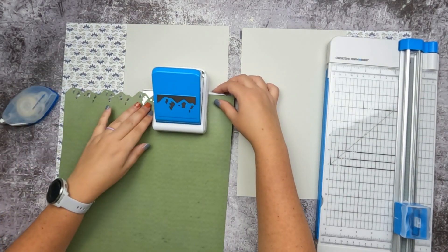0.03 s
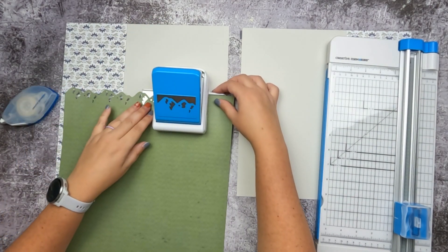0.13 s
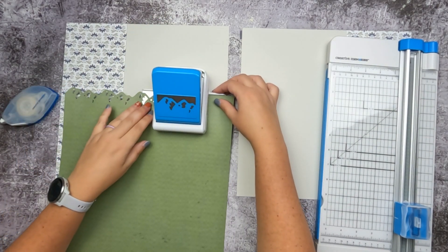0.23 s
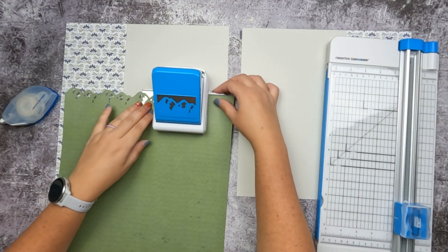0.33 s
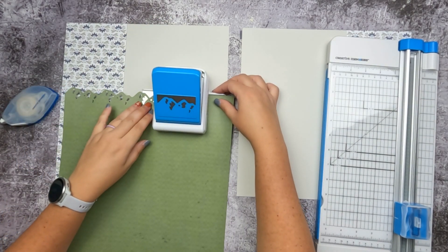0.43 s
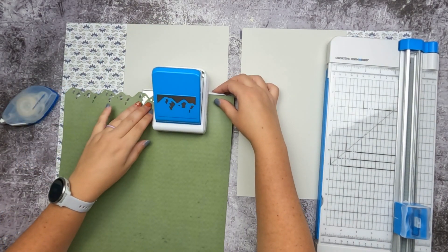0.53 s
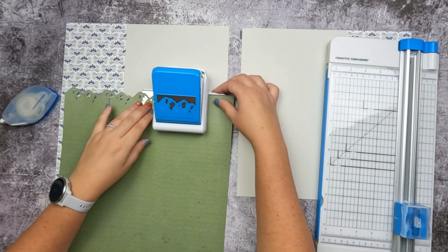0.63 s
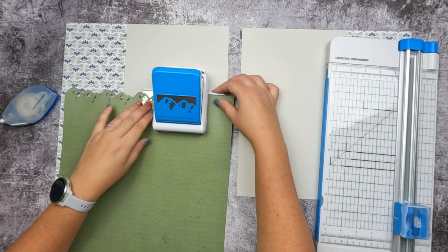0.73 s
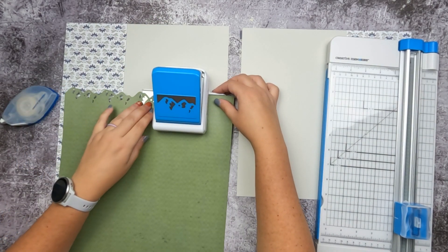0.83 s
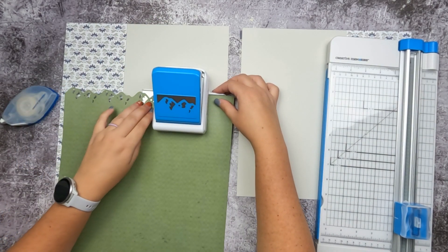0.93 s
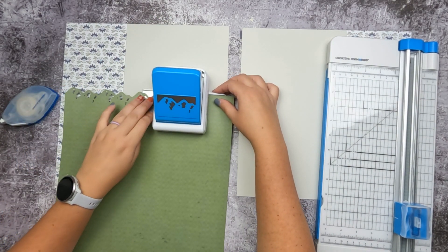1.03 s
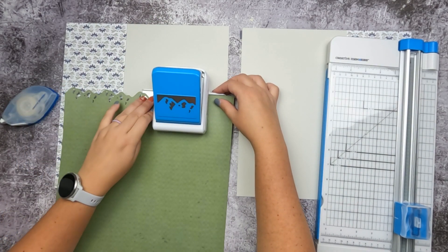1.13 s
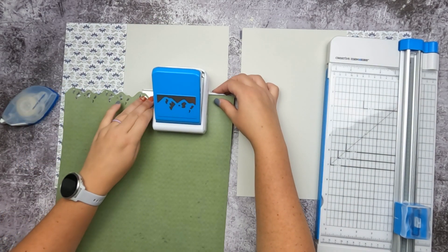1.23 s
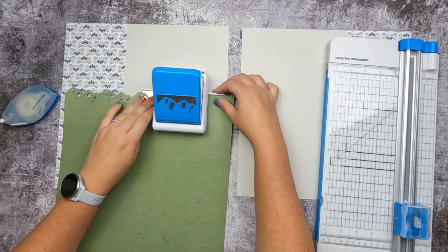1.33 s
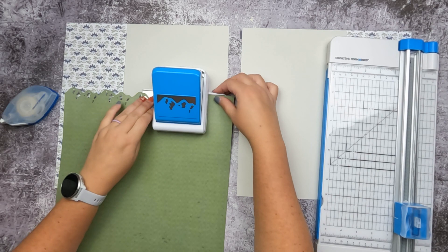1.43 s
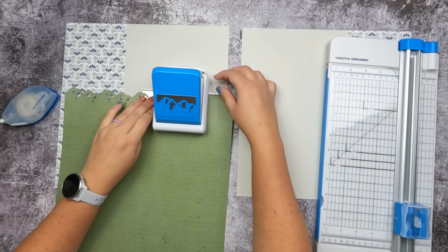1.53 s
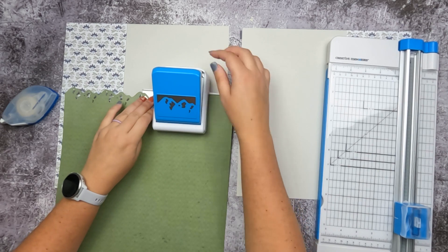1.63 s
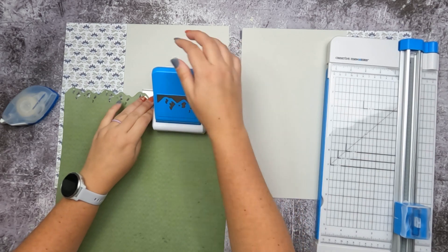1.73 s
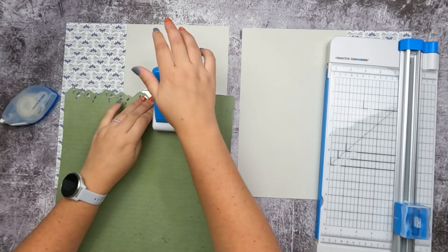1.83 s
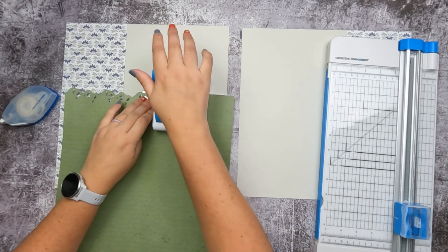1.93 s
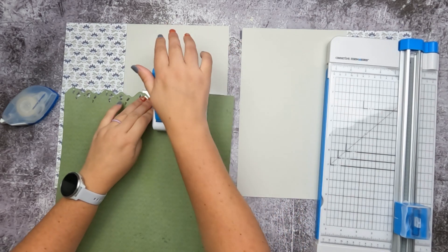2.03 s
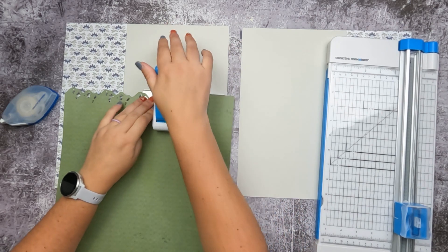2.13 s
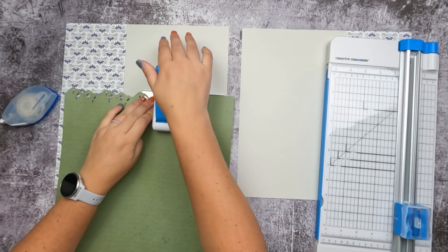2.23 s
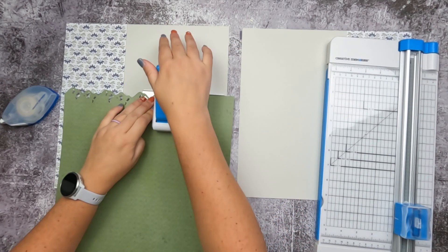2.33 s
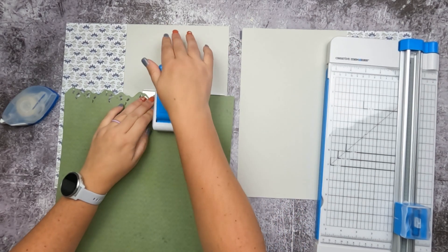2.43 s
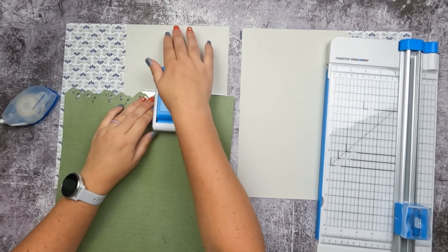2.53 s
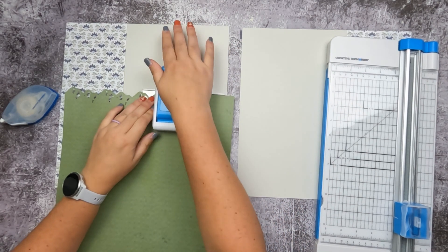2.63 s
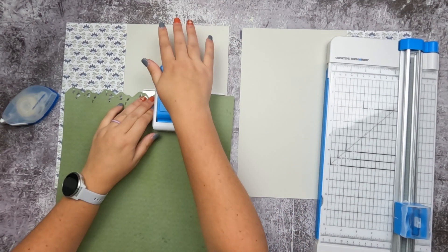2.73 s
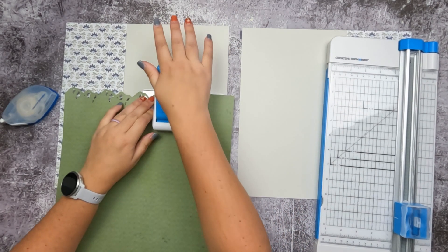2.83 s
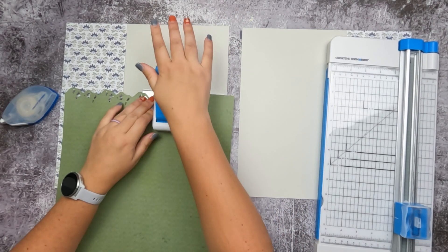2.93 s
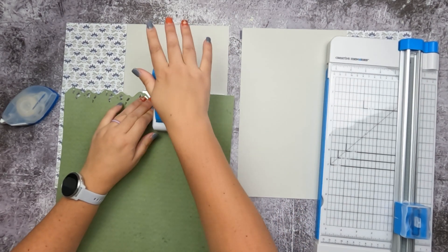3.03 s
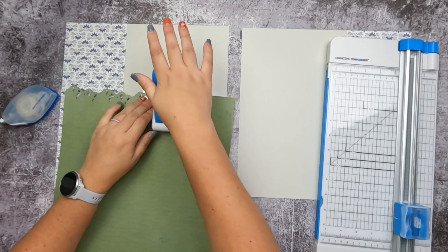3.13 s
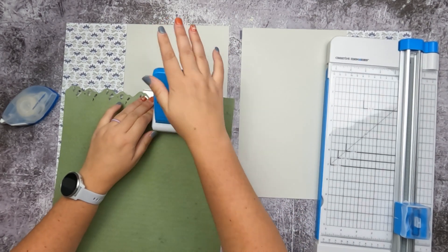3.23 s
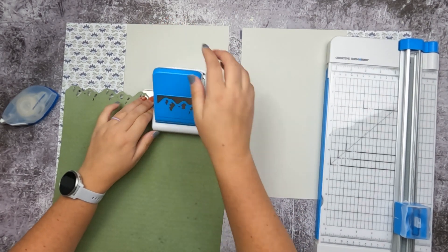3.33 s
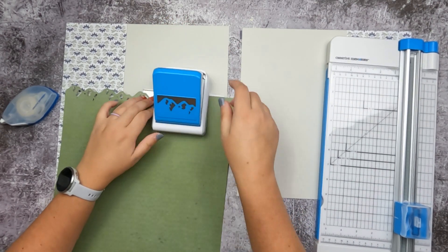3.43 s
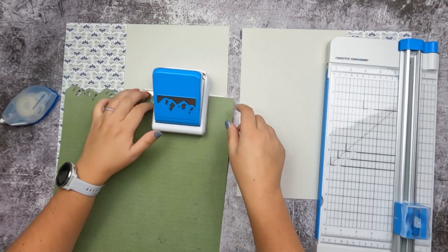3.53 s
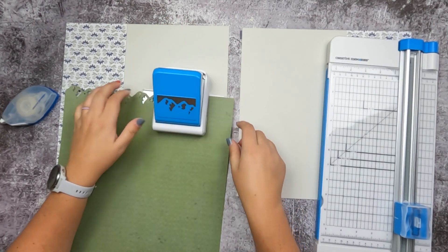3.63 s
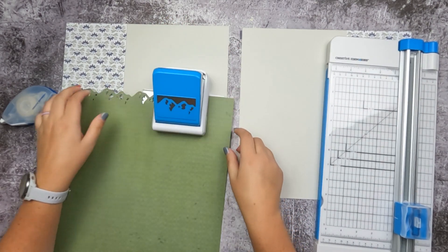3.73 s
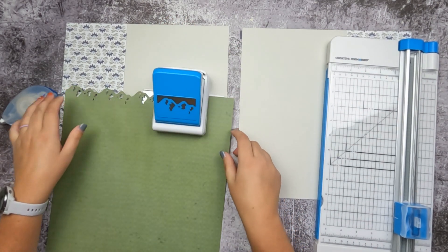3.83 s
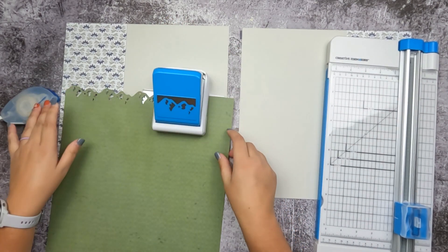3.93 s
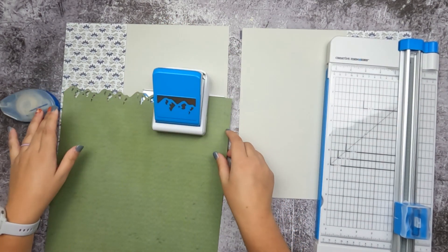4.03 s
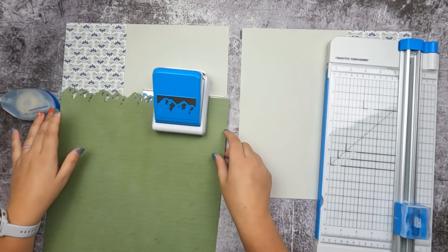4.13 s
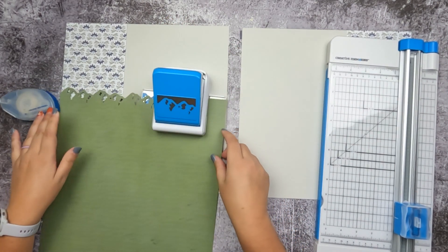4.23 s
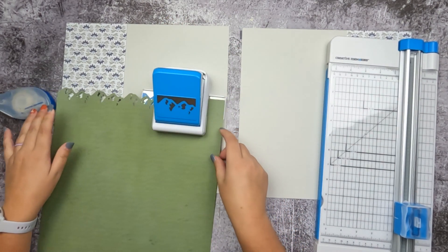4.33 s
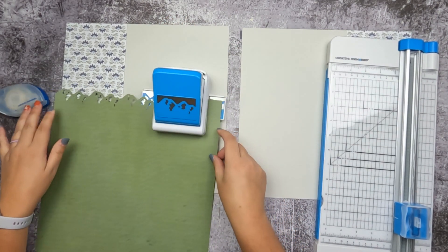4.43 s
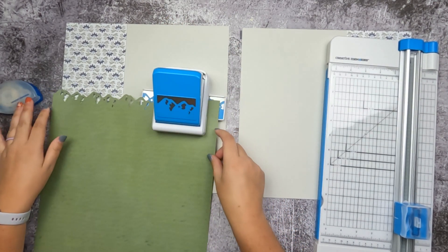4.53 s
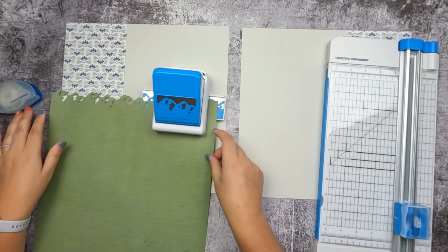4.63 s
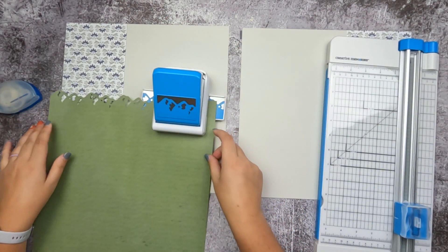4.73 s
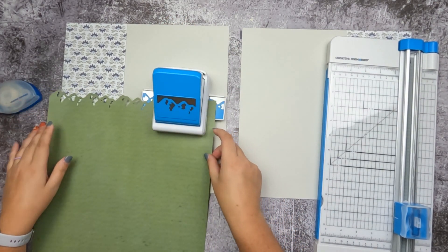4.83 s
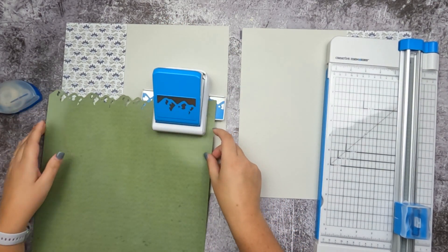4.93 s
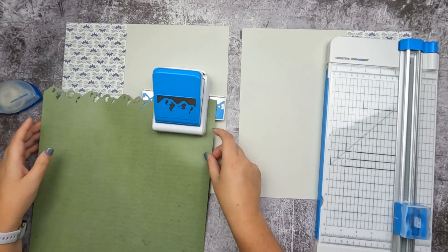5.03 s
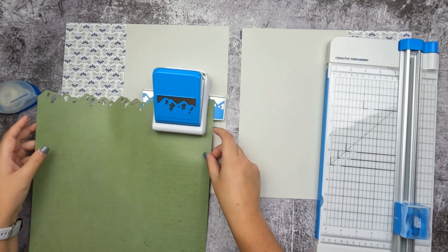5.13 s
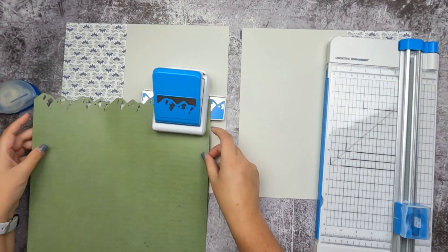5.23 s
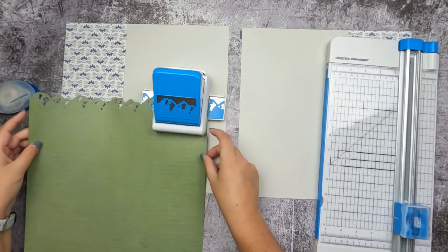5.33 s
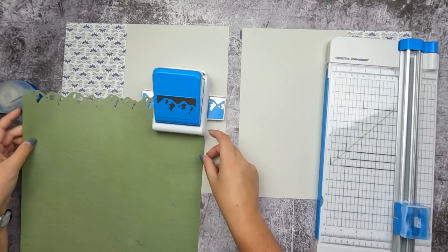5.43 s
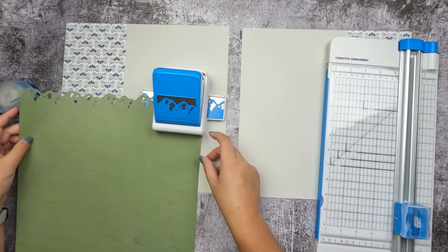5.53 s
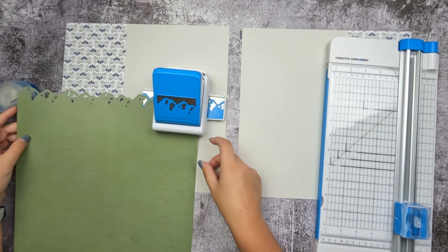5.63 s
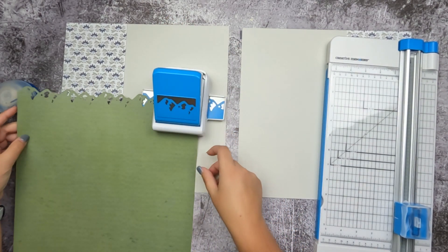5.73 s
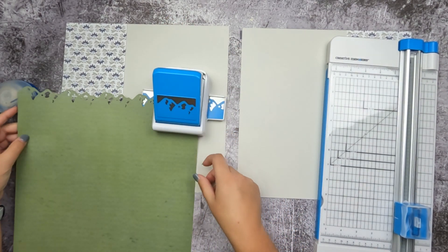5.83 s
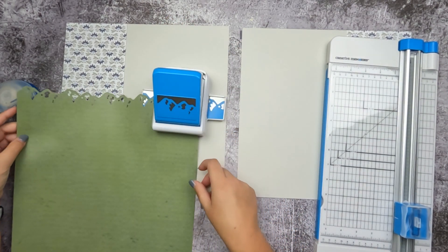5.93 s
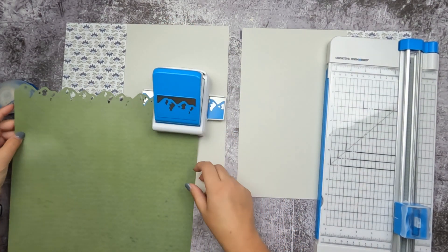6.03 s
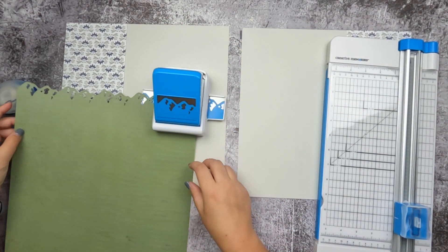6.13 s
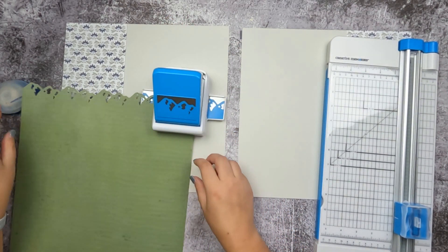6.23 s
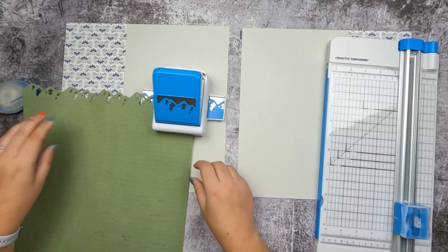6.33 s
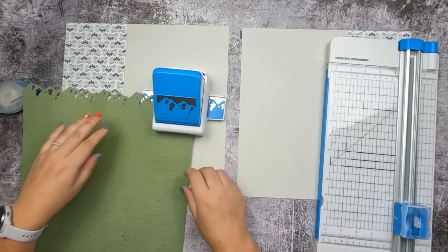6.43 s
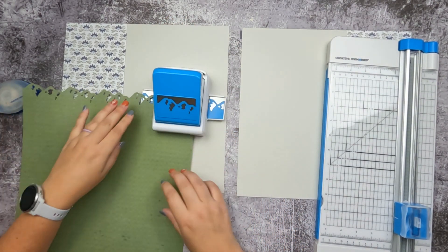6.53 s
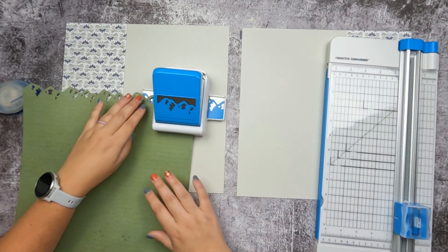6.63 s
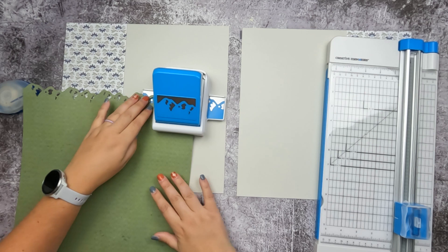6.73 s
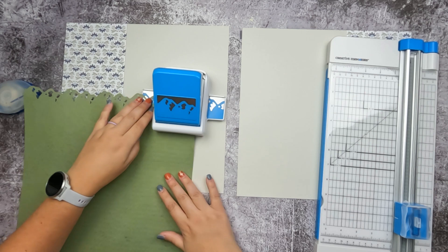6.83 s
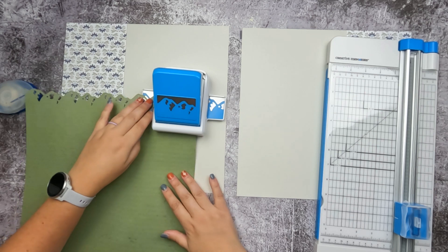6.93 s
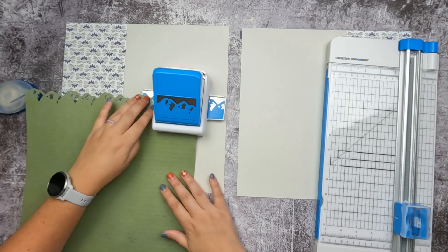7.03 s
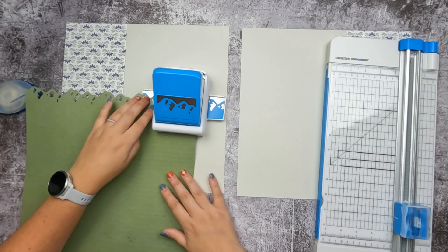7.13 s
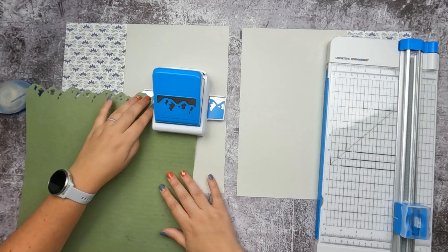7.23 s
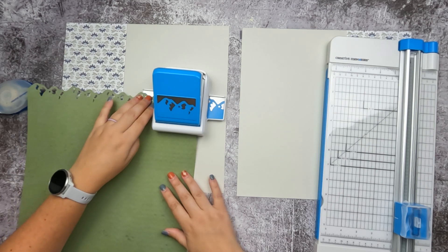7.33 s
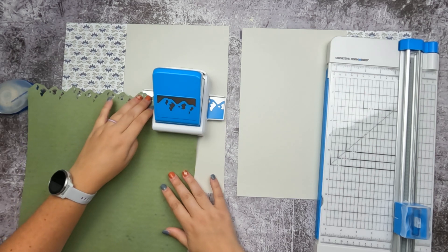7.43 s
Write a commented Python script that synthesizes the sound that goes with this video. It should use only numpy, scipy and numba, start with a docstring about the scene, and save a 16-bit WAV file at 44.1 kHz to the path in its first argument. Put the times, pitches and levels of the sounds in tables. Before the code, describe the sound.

A close stereo microphone on a wooden-sounding table in a small, dull room. Quiet hush and tiny paper ticks come first, then a sharp crackling double crunch and a heavy clunk as a craft punch bites thick paper. Low thuds and rattling follow as the table rocks, with a small lever creak. Afterwards the sheet is rubbed, shifted and ticked by fingers, fading to soft rustles; a far engine hums faintly.

```python
"""A hand leans on a plastic border punch close by until its steel die crunches through card in three bites.
The lever creaks back, the table rocks and knocks for a second, and the card is slid and ticked about.
Short pushes and grit ring the modes of punch and table; the card is filtered noise, clicks and bursts.
Behind them lie low shaking of the table, two climbing tones of an engine far outside and quiet room hush.
A two-port microphone hears all this with a short scatter and a dull room tail."""
import sys
import numpy as np
from scipy import signal
from scipy.fft import rfft, irfft
from scipy.io import wavfile
from scipy.ndimage import uniform_filter1d
from numba import njit

SR = 44100
rng = np.random.default_rng(int(sys.argv[2]) if len(sys.argv) > 2 else 0)


def wrap_up_sound(samples):
    """Save the sound to the file named by the first command line argument, as 16-bit audio."""
    columns = np.atleast_2d(samples).T
    # keep every value between -1 and 1, then stretch to whole-number steps
    tamed = np.clip(columns, -1, 1)
    steps = np.round(tamed * 32767).astype(np.int16)
    wavfile.write(sys.argv[1], SR, steps)


N = 329868  # samples, about 7.5 s


def undb(db):
    """Decibels to an amplitude factor."""
    return 10 ** (np.asarray(db) / 20)


def unit(x):
    """Scale to rms 1."""
    return x / np.sqrt(np.mean(x ** 2))


def noise():
    """White noise for the whole scene."""
    return rng.standard_normal(N)


def wobble(cutoff_hz):
    """Slow chance of rms 1: noise low-passed at cutoff_hz."""
    return unit(signal.lfilter(*signal.butter(2, cutoff_hz, fs=SR), noise()))


def tone(hz):
    """Sine of rms 1 whose pitch follows hz."""
    phase = 2 * np.pi * np.cumsum(hz) / SR
    return np.sqrt(2) * np.sin(phase)


def band(x, hz, width_hz):
    """Two-pole resonance, gain 1 at the centre."""
    centre_hz = min(hz, .45 * SR)
    sharpness = hz / min(width_hz, .3 * SR)
    return signal.lfilter(*signal.iirpeak(centre_hz, sharpness, fs=SR), x)


@njit
def sweep(x, hz, width_hz):
    """State-variable band-pass whose centre moves."""
    y = np.empty(len(x))
    band_state, low_state = 0., 0.
    for i in range(len(x)):
        g = np.tan(np.pi * hz[i] / SR)
        damping = width_hz / hz[i]
        v = (band_state + g * (x[i] - low_state)) / (1 + g * (g + damping))
        band_state = 2 * v - band_state
        low_state += 2 * g * v
        y[i] = damping * v
    return y


def ring(force, modes):
    """Decaying modes driven by a force; neighbours swing in opposite sense."""
    out = 0
    for k, (hz, db, t60_s) in enumerate(modes):
        pole = np.exp(2j * np.pi * hz / SR - np.log(1000) / (t60_s * SR))
        swing = signal.lfilter([1], [1, -pole], force + 1e-18).imag
        out = out + (-1) ** k * undb(db) * swing
    return out


def blows(times, db, length_s, rough):
    """A short push at each time; rough (0-1) breaks it up into a burst of small slips."""
    force = np.zeros(N + SR)
    n = int(length_s * SR) + 2
    shape = np.hanning(n + 2)[1:-1]
    smooth_push = shape / shape.sum()
    slip_shape = shape / np.sqrt(np.sum(shape ** 2))
    chance = rng.standard_normal((len(times), SR // 20))
    for s, gain, slips in zip(times, undb(db), chance):
        push = (1 - rough) * smooth_push + rough * slip_shape * slips[:n]
        force[int(s * SR):int(s * SR) + n] += gain * push
    return force[:N]


def grit(spread_db, per_s):
    """Dense clicks of uneven size, rms 1."""
    sizes = undb(spread_db * rng.exponential(size=N))
    struck = rng.random(N) < per_s / SR
    return unit(sizes * struck * noise())


def bursts(times, db, hz, t60_s, wide):
    """A sharp click and a dying noise burst round its pitch at each time; wide = width / pitch, db = peak."""
    out, t = np.zeros(N + SR), np.arange(SR // 10) / SR
    for s, gain, f, decay_s in np.broadcast(times, undb(db), hz, t60_s):
        burst = rng.standard_normal(len(t)) * 1000 ** (-t / max(decay_s, .002))
        burst[0] += 9.  # the click
        burst = band(band(burst, f, wide * f), f, 2 * wide * f)
        out[int(s * SR):int(s * SR) + len(t)] += gain * burst / np.abs(burst).max()
    return out[:N]


FADE_DB = 25  # how far a stroke lies under its peak at its start and end


def strokes(rows, roundness):
    """Rows swell from start to peak and die toward the end; returns level and power-weighted other columns."""
    t, fine_t = np.arange(0, N / SR + .002, .001), np.arange(N) / SR
    start, peak, end, db, *columns = np.transpose(rows)[:, :, None]
    # rise and fall take at least 2 ms, even where an end is given before its peak
    before = (peak - t) / np.maximum(peak - start, .002)
    after = (t - peak) / np.maximum(end - peak, .002)
    away = np.where(t < peak, before, after)
    power = undb(db - FADE_DB * np.minimum(away, 4) ** roundness) ** 2
    total = power.sum(0)
    blended = [(power * c).sum(0) / total for c in columns]
    return [np.interp(fine_t, t, c) for c in (np.sqrt(total), *blended)]


def curves(tables):
    """A fade that is 1 inside the spans and 0 outside, then the columns over time."""
    rows, t = np.concatenate(tables), np.arange(N) / SR
    inside = sum((t >= k[0][0]) & (t < k[-1][0]) for k in tables) > 0
    fade = uniform_filter1d(1. * inside, size=600)
    return [fade, *(np.interp(t, rows[:, 0], c) for c in rows[:, 1:].T)]


# Colour of the quiet room's hush. Each row: frequency in Hz, relative level in dB per Hz.
AIR_COLOUR = [(35, -45.5), (60, -15.5), (102, -27.5), (162, -4.5), (251, -7.5), (295, -19), (408, -11),
              (480, -16), (1420, -23), (1710, -22), (1880, -25.5), (5180, -34.5), (15000, -44)]
AIR_DB, AIR_SIDE_DB = -70, -2.5  # rms of the part common to both ports; differing part minus common
AIR_LEFT_DB = 3  # left minus right


def air():
    """Room hush: shaped noise, partly different at the two ports of the microphone."""
    hz = np.fft.rfftfreq(N, 1 / SR) + 1
    colour_hz, colour_db = np.array(AIR_COLOUR).T
    gain = undb(np.interp(np.log(hz), np.log(colour_hz), colour_db))
    mid, side = (unit(irfft(rfft(noise()) * gain, N)) for _ in range(2))
    ports = mid + undb(AIR_SIDE_DB) * side * np.array([[1], [-1]])
    return undb(AIR_DB) * ports * undb([[AIR_LEFT_DB / 2], [-AIR_LEFT_DB / 2]])


# The engine far outside, in two spans.
# Each row: time in seconds, shaft pitch in Hz, shaft tone in dB, firing tone in dB.
FAR_ENGINE = [
    [(4.1, 49.8, -73, -90), (4.39, 51.9, -73, -85.5), (4.656, 54.8, -67.5, -76), (4.842, 55.4, -74, -69.5),
     (4.97, 55.4, -79, -76)],
    [(5.36, 60, -85, -78.5), (5.44, 60.2, -83, -67), (5.686, 62.06, -71.5, -61), (5.842, 61.9, -94, -73.5),
     (6.086, 62.8, -81.5, -62), (6.3, 63.6, -91.5, -72), (6.46, 64.1, -84, -69), (6.95, 64.6, -84.5, -75.5)],
]


def engine():
    """Shaft tone and its double, the firing tone, climb as the engine pulls away."""
    on, hz, shaft_db, firing_db = curves(FAR_ENGINE)
    return on * (undb(shaft_db) * tone(hz) + undb(firing_db) * tone(2 * hz))


# The table as a whole slab. Each row: frequency in Hz, level in dB, t60 in seconds.
SLAB_MODES = [(32.7, -7.5, 0.23), (102, -1.5, 0.043), (153, 0, 0.19)]
# Its top panel. Each row: frequency in Hz, level in dB, t60 in seconds.
PANEL_MODES = [(222, -4, .12), (263, -5, 0.14), (312.5, 3.5, 0.11), (444, -8, 0.087)]
# Low shaking of the table, strongest after the snaps and knocks.
# Each row: start, peak and end in seconds, level in dB, upper modes minus level in dB.
TABLE_SHAKES = [(1.25, 1.45, 1.56, -58.5, 3), (1.7, 1.85, 2.02, -60.5, -17), (2.02, 2.06, 3.2, -47, -22),
                (2.27, 2.33, 2.5, -30, -10.5), (2.38, 2.46, 2.51, -39, -10),
                (2.55, 2.64, 2.735, -21.5, -30), (2.72, 2.83, 3.08, -43.5, -15), (3., 3.14, 3.15, -50, 9),
                (3.12, 3.27, 3.47, -40, -17.5), (3.4, 3.46, 3.8, -47, -14), (3.6, 3.67, 3.83, -50.5, -8),
                (3.8, 3.87, 4.2, -57, -12.5)]
RUMBLE_DB, RUMBLE_UPPER_DB = -74.5, -75.5  # faint steady rumble: median level of the lowest mode, upper modes


def shake():
    """Snaps and knocks leave the table's lowest mode wobbling and its others stirred, over a faint rumble."""
    level, upper_db = strokes(TABLE_SHAKES, roundness=1.1)
    push = noise()
    lowest = unit(band(band(noise(), 21, 31), 18, 50))
    upper = unit(ring(push, SLAB_MODES[1:]) + undb(-2.5) * ring(push, PANEL_MODES))
    lowest_level = level + undb(RUMBLE_DB + 1.3 * wobble(3.7))
    upper_level = level * undb(upper_db) + undb(RUMBLE_UPPER_DB)
    return lowest_level * lowest + upper_level * upper


# Strokes of the card on the mat, and one faint spring squeak near 3.3 s.
# Each row: start, peak and end in seconds, level in dB,
# treble minus level in dB, flutter centre in Hz, body minus level in dB.
CARD_STROKES_AND_SQUEAK = [(1.2, 1.216, 1.23, -68.5, -5.5, 2350, -8),
                           (1.287, 1.297, 1.61, -64.5, -32, 1700, 3.5),
                           (1.2, 1.41, 1.42, -65, -21, 1740, 2), (1.474, 1.482, 1.56, -56, -5.5, 2210, -13),
                           (1.595, 1.626, 1.66, -62.5, -7, 2660, -6.5),
                           (3.25, 3.29, 3.46, -67, -9, 2050, -8), (3.51, 3.553, 3.64, -52.5, -11, 2150, -9),
                           (3.63, 3.645, 3.715, -58, -6, 2180, -8),
                           (3.65, 3.81, 3.89, -62.5, -2, 2400, -16),
                           (3.95, 3.967, 4.08, -60.5, -8.5, 3200, -11),
                           (4.0, 4.146, 4.2, -61, -8, 3000, -8.5), (4.17, 4.248, 4.44, -55, -11, 3800, -19),
                           (4.3, 4.55, 4.74, -59.5, -5, 3000, -6.5),
                           (4.55, 4.836, 4.98, -59.5, -5.5, 2640, -9), (2.5, 5., 10, -74, -6, 2702, -4),
                           (5.03, 5.038, 5.1, -59.5, 1, 2665, 3), (5.15, 5.217, 5.39, -49, -7, 3040, -14),
                           (5.325, 5.337, 5.45, -57, -9, 2400, 2),
                           (5.3, 5.5, 5.7, -51.5, -11.5, 2800, -26.5),
                           (5.45, 5.7, 5.77, -47, -19, 2650, -16),
                           (5.74, 5.78, 6.54, -67.5, -13, 2720, -4.5),
                           (5.85, 5.98, 6.32, -55.5, -7, 2850, -13),
                           (6.13, 6.3, 6.32, -49, -13.5, 2470, -12.5),
                           (6.342, 6.349, 6.41, -53.5, -5, 2550, -1.5),
                           (6.39, 6.402, 5.8, -68, -2, 2545, -6), (6.49, 6.58, 6.97, -58, -1, 2780, -8.5),
                           (6.76, 6.946, 7.1, -54, -5, 3200, -19.5),
                           (7.12, 7.168, 7.16, -65.5, -10, 3276, -16.5),
                           (7.2, 7.28, 8.1, -66.5, -10.5, 2960, -17), (7.2, 7.45, 7.6, -64, -8, 2840, -9)]
# Resonances of the sheet. Each row: frequency in Hz, width in Hz (doubled in the second pass), level in dB.
SHEET_BANDS = [(1970, 1260, 9.5), (2620, 1500, 13.5), (3680, 1100, 10), (5300, 9000, -13)]
# Treble of the rubbing. Each row: frequency in Hz, width in Hz (doubled in the second pass), level in dB.
TREBLE_BANDS = [(5930, 1800, -10), (7080, 1850, 3.5), (9000, 2660, -3), (11400, 3000, -7.5)]
FLUTTER_WIDTH_HZ = 750.  # doubled in the second pass
FLUTTER_DB, FLUTTER_PER_TREBLE = -9, -0.86  # flutter minus swish; duller strokes flutter more (dB per dB)


def slide():
    """Rubbing grit that catches and lets go gives broad swish, moving flutter, treble and body; so the squeak."""
    level, treble_db, hz, body_db = strokes(CARD_STROKES_AND_SQUEAK, roundness=1.32)
    share = 1 / (1 + undb(-(FLUTTER_DB + FLUTTER_PER_TREBLE * treble_db)))
    rub = grit(spread_db=-1.0, per_s=6000) * undb(2.5 * wobble(23.5))
    # the flat of the sheet glides evenly; only the edge that flutters catches
    glide = noise() * undb(0.32 * wobble(10.5)) + undb(-9.5) * rub
    swish = unit(sum(undb(g) * unit(band(band(glide, f, w), f, 2 * w)) for f, w, g in SHEET_BANDS))
    flutter = unit(sweep(sweep(rub, hz, FLUTTER_WIDTH_HZ), hz, 2 * FLUTTER_WIDTH_HZ))
    treble = unit(sum(undb(g) * band(band(glide, f, w), f, 2 * w) for f, w, g in TREBLE_BANDS))
    body = unit(band(band(glide, 1430, 1070), 1330, 1300))
    sheet = share * flutter + (1 - share) * swish
    return level * (sheet + undb(treble_db) * treble + undb(body_db) * body)


# The lever of the punch. Each row: frequency in Hz, level in dB, t60 in seconds.
LEVER_MODES = [(922, -7.5, 0.051), (1058, 2, 0.066), (1247, -10.5, 0.044), (1390, -6.5, 0.015),
               (1900, -13, 0.01)]
# Card edges and finger nails ticking. Each row: time in seconds, peak in dB, pitch in Hz,
# bright edge minus peak in dB, push on the table in dB, push on the lever in dB.
CARD_TICKS = [(0.115, -54, 2960, -1.5, -67, -72), (0.269, -67, 1450, 11.5, -66.5, -90.5),
              (1.215, -56.5, 2690, -23, -79, -74), (1.294, -47.5, 1690, -30, -53, -57),
              (1.482, -43.5, 1500, -14, -49.5, -62), (1.62, -48.5, 2680, -21, -51.5, -70),
              (3.553, -34.5, 1980, -11, -45, -56), (3.673, -50.5, 2510, 9, -58, -64),
              (3.967, -47.5, 1300, -2, -45.5, -60), (4.103, -53, 1265, 6, -64, -74),
              (4.13, -49, 1250, -2, -66, -65), (4.243, -43, 3900, -27.5, -56.5, -52),
              (5.038, -40.5, 3140, 5.5, -62.5, -42), (5.194, -40.5, 3040, -12, -79, -51),
              (5.337, -38, 2770, -25, -67, -72), (5.519, -36, 2600, -29, -81, -70),
              (5.614, -40, 2650, -30, -81, -76), (5.637, -35, 2620, -26, -85, -69),
              (5.69, -48.5, 2540, -32, -66, -58), (5.72, -46, 1500, -10, -57, -49),
              (5.731, -47, 2666, -20, -67, -54), (5.965, -41.5, 2494, -24, -57, -59),
              (5.989, -48, 2044, -17, -60.5, -67), (6.093, -38.5, 2930, -24, -58.5, -55.5),
              (6.212, -49, 2700, -23, -58, -74), (6.35, -32, 2574, 1.5, -58.5, -57),
              (6.36, -39, 2658, 1, -62, -66), (6.402, -40, 2610, -6, -85, -69),
              (6.989, -45, 3170, -15, -56, -66)]
TICK_T60_S = 0.027


def ticks():
    """Each tick has its own pitch and a bright edge, thuds in the table and rings the lever of the punch."""
    s, db, hz, edge_db, thud_db, lever_db = np.transpose(CARD_TICKS)
    card = bursts(s, db, hz, TICK_T60_S, wide=0.35)
    edge = bursts(s, db + edge_db, 7300, 0.55 * TICK_T60_S, wide=1.0)
    thud = ring(blows(s, thud_db, 0.0027, rough=0), SLAB_MODES[1:] + PANEL_MODES)
    lever = ring(blows(s, lever_db, 0.00035, rough=0), LEVER_MODES)
    return card + edge + thud + lever


# The loose table leg rocking against the floor. Each row: time in seconds, knock in dB, slab in dB.
LEG_KNOCKS = [(2.812, -35.5, -33.5), (3.035, -41, -46), (3.206, -34, -33.5), (3.429, -35, -38.5),
              (3.645, -40, -41.5), (3.855, -44.5, -45.5)]
# What the leg sets ringing. Each row: frequency in Hz, level in dB, t60 in seconds, swell in seconds.
LEG_MODES = [(419, -3, 0.08, 0.0011), (547.6, -17, 0.066, 0.0018), (206, 0.5, 0.13, 0.0018),
             (148.4, 5, 0.15, 0.012), (119.97, 2.5, 0.33, 0.033)]
SCATTER_DB, SCATTER_PITCH = 2, 0.014  # each knock rings its modes a little differently (pitch as a share)
CLICK_DB = -21  # faint click minus knock


def rocking():
    """Dull knocks: the higher modes speak at once, the slab's lowest swell behind them."""
    out, t = np.zeros(N + SR), np.arange(SR // 2) / SR
    chances = rng.standard_normal((len(LEG_KNOCKS), len(LEG_MODES), 2))
    for (s, knock_db, slab_db), chance in zip(LEG_KNOCKS, chances):
        for (hz, db, t60_s, swell_s), (louder, higher) in zip(LEG_MODES, chance):
            blow_db = slab_db if hz < 180 else knock_db
            gain = undb(db + SCATTER_DB * louder + blow_db)
            wave = np.sin(2 * np.pi * hz * (1 + SCATTER_PITCH * higher) * t)
            envelope = (1 - np.exp(-t / swell_s)) * 1000 ** (-t / t60_s)
            out[int(s * SR):int(s * SR) + len(t)] += gain * envelope * wave
    s, knock_db, _ = np.transpose(LEG_KNOCKS)
    return out[:N] + bursts(s, knock_db + CLICK_DB, 1500, 0.034, wide=1.306)


# The hollow plastic base and the lever. Each row: frequency in Hz, level in dB, t60 in seconds.
SHELL_MODES = [(608.2, -1, 0.095), (662, 0.5, 0.03), (669, 3, 0.053), (763, -4, 0.03), (856, -4.5, .04)]
# The steel die. Each row: frequency in Hz, level in dB, t60 in seconds.
DIE_MODES = [(2032, 3, 0.014), (2660, -12.5, 0.0029), (3350, 2, 0.011), (3850, 0.5, 0.02),
             (4150, -1, 0.025), (5610, -13, 0.002), (6660, -12.5, .008), (8900, -16.5, 0.022),
             (11820, -27, 0.0033)]
# Teeth of the die snapping through, and lever knocks. Each row: time in seconds, pushes on base, lever
# and table in dB, peak of the crack in dB, pitch of the crack in Hz.
DIE_SNAPS = [(2.048, -53.5, -52.5, -54.5, -54.5, 1660), (2.211, -56, -55, -57, -49, 1860),
             (2.229, -48, -43, -49, -38, 1780), (2.276, -21, -33.5, -35.5, -33, 1520),
             (2.282, -32.5, -34, -30.5, -29.5, 1500), (2.288, -29.5, -38, -29, -34.5, 3200),
             (2.298, -33, -38.5, -28, -29.5, 1520), (2.335, -36, -46.5, -41, -43, 3300),
             (2.354, -24.5, -34.5, -36, -41.5, 2100), (2.362, -21.5, -34, -36.5, -32.5, 3380),
             (2.376, -22.5, -35, -33.5, -35.5, 3400), (2.385, -25, -34, -33, -32, 3650),
             (2.411, -47, -39.5, -41.5, -36.5, 3570), (2.456, -33.5, -44.5, -46, -50, 3450),
             (2.515, -28, -28, -35.5, -36.5, 4141), (2.526, -33, -24, -33, -35.5, 2160),
             (2.534, -20.5, -17.5, -27, -28.5, 2120), (2.547, -17.5, -16, -28, -23, 4000),
             (2.562, -29, -26.5, -27.5, -26.5, 1940), (2.578, -20, -16.5, -28.5, -10, 4300),
             (2.585, -26, -16, -25.5, -19.5, 1840), (2.592, -22, -22, -24, -26, 1920),
             (2.604, -23.5, -17, -25.5, -24, 3900), (2.613, -29, -27, -27, -34.5, 1840),
             (2.63, -37, -38, -34, -29.5, 1950), (2.91, -57, -72, -42, -65, 2750),
             (3.018, -62, -48, -56, -46, 3300), (3.052, -66, -44, -46, -34, 3770),
             (3.065, -50, -36, -64, -29, 1940), (3.089, -57, -38, -57, -32.5, 1539),
             (3.124, -61, -49, -44.5, -39, 1880), (3.203, -66.5, -63, -62, -54, 2237),
             (3.245, -75, -50.5, -48, -52, 2180), (3.268, -60, -57, -48.5, -44, 2170)]
# Card fibres tearing and the lever rubbing.
# Each row: start, peak and end in seconds, shell in dB, crackle minus shell in dB.
FIBRE_TEARS = [(2.222, 2.232, 2.38, -54.5, -0.5), (2.266, 2.285, 2.333, -32, -3.5),
               (2.32, 2.366, 2.45, -32, -7), (2.452, 2.458, 2.47, -40, -6), (2.51, 2.517, 2.6, -34, -5.5),
               (2.515, 2.546, 2.626, -21.5, -8), (2.55, 2.604, 2.632, -25.5, -10),
               (2.6, 2.64, 2.72, -46.5, 1.5), (2.9, 2.912, 3.155, -52, -2), (3.005, 3.02, 3.5, -61, 8),
               (2.95, 3.074, 3.14, -46, 2), (3.185, 3.207, 3.29, -67, 10), (3.235, 3.266, 3.304, -68, 15)]
# The table humming under the leaning hand. Each row: start, peak and end in seconds, level in dB, pitch in Hz.
TABLE_HUM = [(2.03, 2.055, 2.07, -49, 146.5), (2.262, 2.285, 2.3, -28.5, 143.1),
             (2.34, 2.365, 2.42, -34, 110), (2.37, 2.426, 2.27, -31.5, 123.1),
             (2.505, 2.565, 2.63, -20, 98.6), (2.58, 2.612, 2.68, -23.5, 211),
             (2.903, 2.915, 2.99, -43, 303.1), (3.0, 3.077, 3.14, -38, 308.5)]
SLAB_SHARE_DB, CRACK_NOISE_DB = 3.5, 8  # slab push minus panel push; noise burst minus push on the die
CRACKLE_HZ, TEAR_TABLE_DB = 2230, 3.5  # crackle centre; torn fibres in the panel minus shell


def punch():
    """Snaps and tearing drive base, lever, die and table; the torn fibres also crackle on their own."""
    s, shell_db, lever_db, table_db, crack_db, crack_hz = np.transpose(DIE_SNAPS)
    tear_level, crackle_db = strokes(FIBRE_TEARS, roundness=1.1)
    tear = grit(spread_db=2.0, per_s=5000)
    shell = ring(blows(s, shell_db, .0006, rough=0.16), SHELL_MODES)
    shell += ring(blows(s, lever_db, .0004, rough=0.2), LEVER_MODES)
    shell += tear_level * unit(ring(tear, SHELL_MODES) + undb(-2.0) * ring(tear, LEVER_MODES))
    crackle = unit(band(tear, CRACKLE_HZ, 2100.0)) + undb(-7.5) * unit(ring(tear, DIE_MODES))
    die = ring(blows(s, crack_db - CRACK_NOISE_DB, .001, rough=.9), DIE_MODES)
    die += bursts(s, crack_db, crack_hz, 0.039, wide=0.2)
    die += tear_level * undb(crackle_db) * crackle
    slab = ring(blows(s, table_db + SLAB_SHARE_DB, 0.0067, rough=0), SLAB_MODES)
    panel = ring(blows(s, table_db, 0.0025, rough=0), PANEL_MODES)
    panel += tear_level * undb(TEAR_TABLE_DB) * unit(ring(tear, PANEL_MODES))
    hum_level, hum_hz = strokes(TABLE_HUM, roundness=1.8)
    return shell + die + slab + panel + hum_level * tone(hum_hz)


def echoes(x, t60_s, hz):
    """Two unrelated tails of dense reflections, dull above hz."""
    t = np.arange(SR // 2) / SR
    decaying = rng.standard_normal((2, len(t))) * 1000 ** (-t / t60_s)
    tails = signal.lfilter(*signal.butter(1, hz, fs=SR), decaying)
    tails /= np.sqrt(np.sum(tails ** 2, 1, keepdims=True))
    return signal.fftconvolve(x[None], tails, axes=1)[:, :N]


ROOM_T60_S, ROOM_DB, ROOM_HZ = 0.2, -11, 4030  # room tail: decay, level, dull above
LEFT_DB, SPREAD_DB = 0.15, -19  # left minus right port; level of the short scatter


def scene():
    """Near sounds, shaking and engine reach the two ports; scatter, room tail and hush join them."""
    near = punch() + rocking() + ticks() + slide()
    dry = near + shake() + engine()
    # the left port hears the middle treble a little early and the deepest shaking louder
    middle = band(band(near, 3000, 3000), 3000, 4000)
    early = undb(-14) * np.gradient(middle) * SR / (2 * np.pi * 2700)
    lead = early + undb(-10) * band(dry, 30, 40)
    ports = np.array([dry * undb(LEFT_DB / 2) + lead, dry * undb(-LEFT_DB / 2) - lead])
    # the table's lows come through the stand; only what is airborne scatters and fills the room
    airborne = signal.lfilter(*signal.butter(2, 500, "high", fs=SR), near)
    scatter = undb(SPREAD_DB) * echoes(airborne, 0.074, 21000)
    room = undb(ROOM_DB) * echoes(airborne, ROOM_T60_S, ROOM_HZ)
    return ports + scatter + room + air()


# A dip from the recorder's case. In order: centre in Hz, width in Hz, depth as a share from 0 to 1.
TREBLE_DIP = (5250, 1100, 0.41)
SOFT_HZ, TOP_HZ = 11300, 15000  # corner of the capsule's softening; steep upper limit


def record(dry):
    """The case dips the treble, the capsule softens it and the recorder cuts the top."""
    hz, width_hz, depth = TREBLE_DIP
    dipped = dry - depth * band(dry, hz, width_hz)
    soft = signal.lfilter(*signal.butter(2, SOFT_HZ, fs=SR), dipped)
    return signal.sosfilt(signal.ellip(8, .2, 70, TOP_HZ, fs=SR, output="sos"), soft)


dry = scene()
out = record(dry)
wrap_up_sound(out)
```